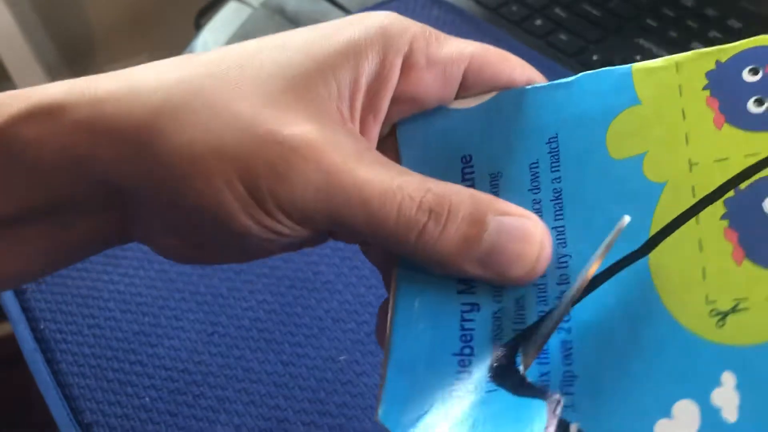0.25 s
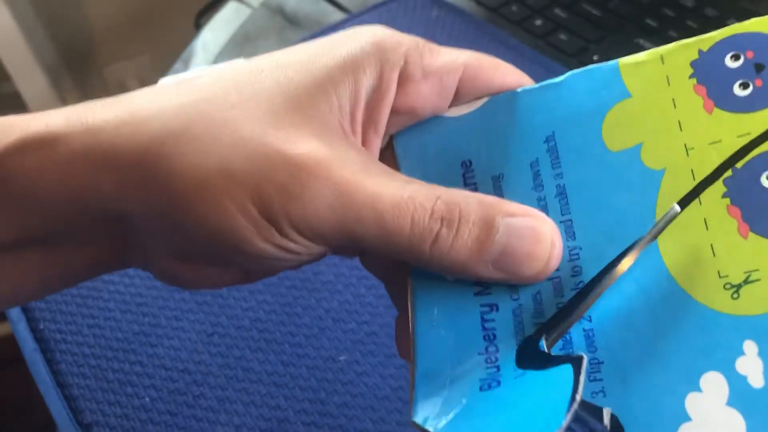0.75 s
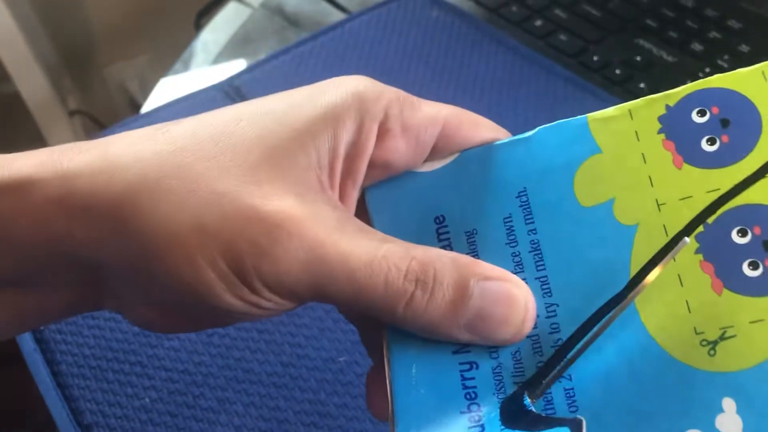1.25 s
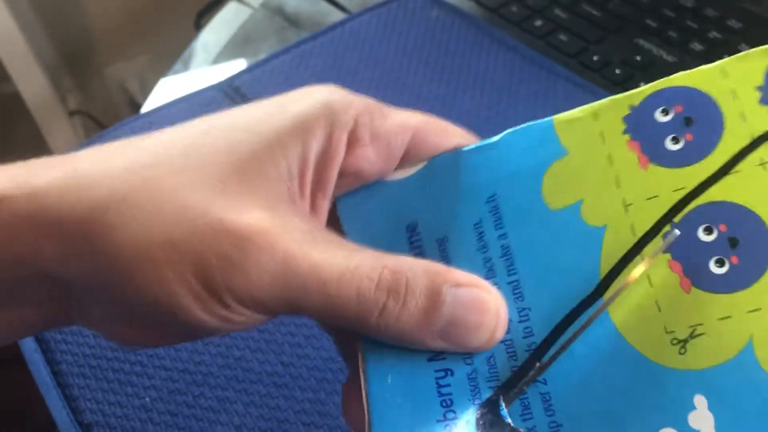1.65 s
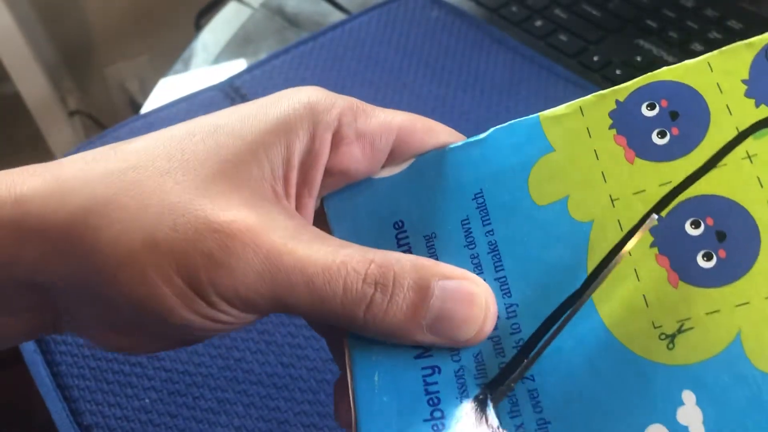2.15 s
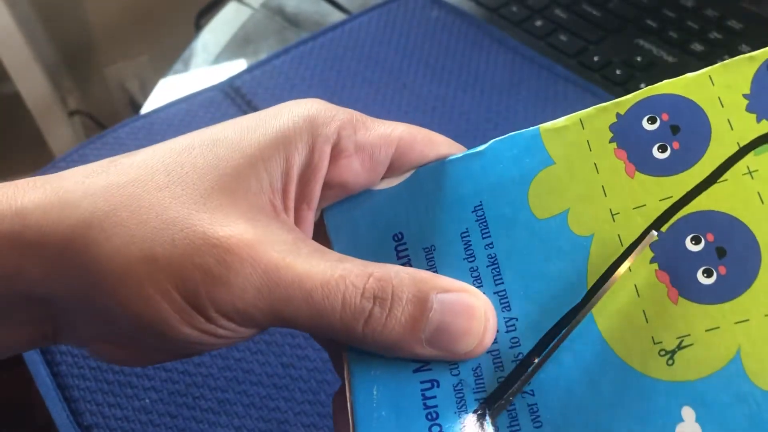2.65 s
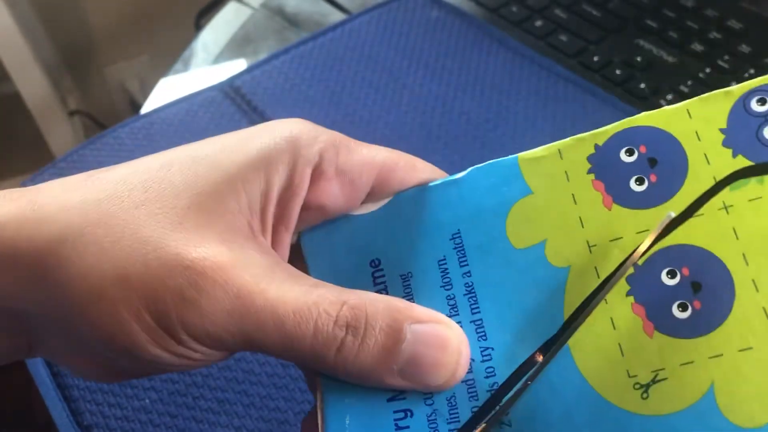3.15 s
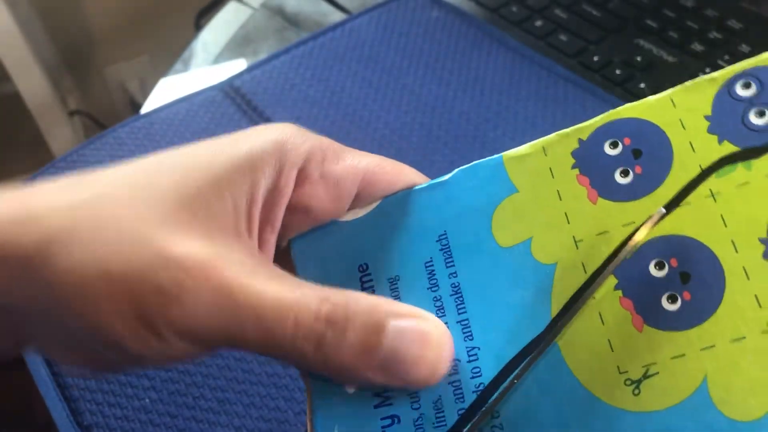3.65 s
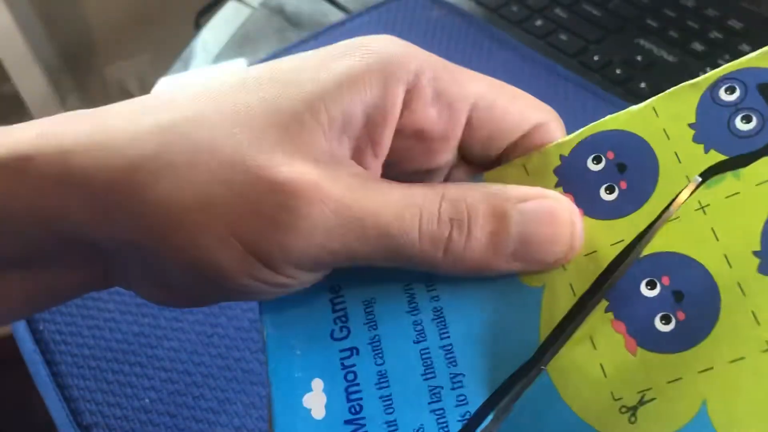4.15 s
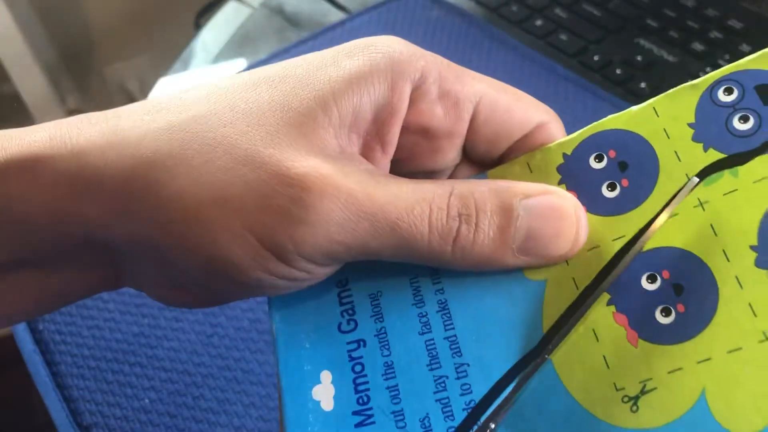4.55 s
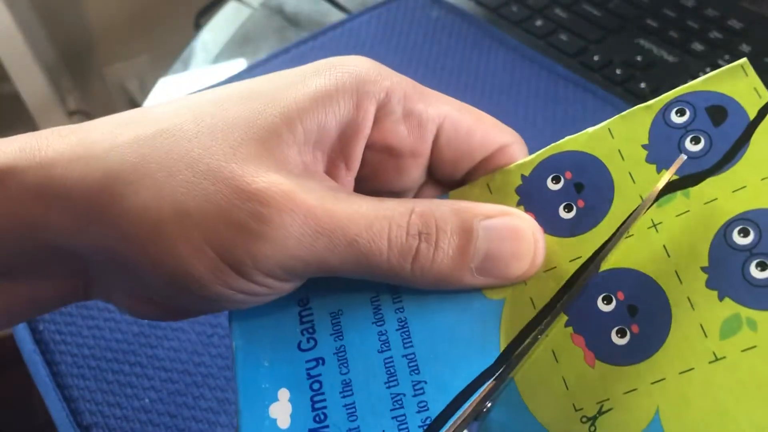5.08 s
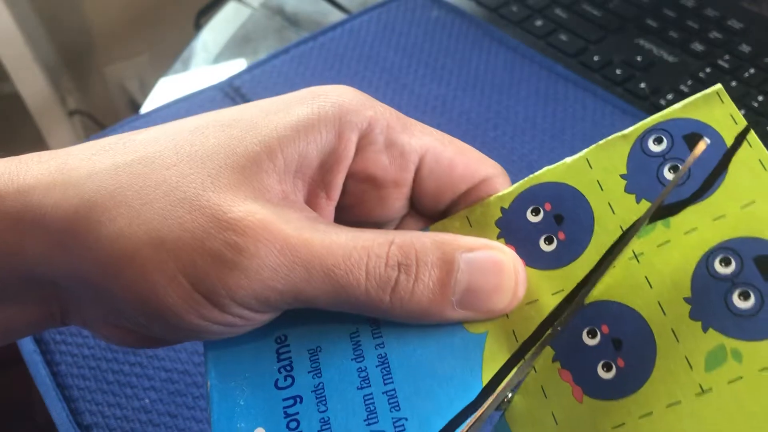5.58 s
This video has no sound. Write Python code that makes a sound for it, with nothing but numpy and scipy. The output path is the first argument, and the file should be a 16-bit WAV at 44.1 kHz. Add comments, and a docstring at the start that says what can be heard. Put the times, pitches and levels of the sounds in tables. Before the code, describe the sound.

Close to the microphone in a quiet room, scissors cut stiff thin card. Soft swishes come first, then a crunch with light steel ticks and snaps. Further short cuts follow irregularly, with blades sliding open between some of them. The hand rubs over the card as it changes hold, then harder, brighter snaps finish the run over a faint low hum.

```python
"""A quiet room with a faint hum: scissors work through a sheet of thin cardboard, close to the microphone.
Each cut is a grainy crunch, most with a run of snaps: fibres give way in tiny bursts and the stiff card carries
them as bending waves, treble first and bass last. The point of contact sets the treble of a whole cut; harder
snaps are quicker. Mostly between the cuts the blades reopen and slide along the slit with a swish; light bright
ticks of steel sound mostly during the cuts. Freed card flaps, the sheet creaks, and once the hand shifts its hold."""
import sys
import numpy as np
from scipy import signal
from scipy.fft import rfft, irfft
from scipy.io import wavfile
from scipy.ndimage import uniform_filter1d

SR = 44100
rng = np.random.default_rng(int(sys.argv[2]) if len(sys.argv) > 2 else 0)


def dump_mix(stems):
    """Bounce the given channels to the path in sys.argv[1] as a 16-bit WAV at rate SR."""
    frames = np.atleast_2d(stems).T  # one column per channel
    limited = np.clip(frames, -1, 1)  # hard clip at full scale
    pcm = np.round(limited * 32767).astype(np.int16)
    wavfile.write(sys.argv[1], SR, pcm)


N = 256662
LEAD_S = 0.012  # a burst has this much room for its warning before the fracture

# Snaps of the card; the less of the sheet is free to swing, the higher it rings:
# (time [s], level [dB], thud [dB], body [dB], pitch of the sheet [Hz])
SNAPS = [(0.7142, -2.5, -3.5, -2.5, 890), (0.8458, 1, 3.5, 6.5, 1060), (1.2839, -13, 4, 5.5, 1090),
         (1.288, -6, 3, 1, 1070), (1.3171, -7, 6.5, 5.5, 930), (1.327, -12.5, 6, 1, 270),
         (1.3694, -8, 14.5, 12, 1010), (1.3965, -10.5, 4.5, -6, 230), (1.586, -16, 9, 0, 397),
         (2.3976, -24, 16.5, 11, 600), (2.5715, -10.5, 7, 2, 260), (2.6188, 0, 9, 0.5, 720),
         (2.6606, -5, 9, 2.5, 215), (2.685, -4.5, 3.5, 0, 215), (2.7673, -1, 11, 4.5, 208),
         (3.267, -4.5, 2, 3, 470), (3.2711, -7, 11.5, 1.5, 447), (3.329, -13.5, 10.5, 5.5, 525),
         (3.3397, -14, -4, -1, 810), (3.3614, -13, -4, 2, 790), (3.393, -2.5, 6.5, -2, 227),
         (3.5738, 0.5, 9.5, 5, 1360), (3.6383, -13.5, -14, -9, 240), (3.687, -4, 2.5, -18, 240),
         (3.722, -18, 9, 4, 473), (3.8708, -12, 0, -2.5, 467), (3.9238, -15, 5, 0, 300),
         (4.3965, -8.5, -5, 3.5, 1580), (4.4045, -10.5, 2, -5, 616), (4.447, -9, 0, 1, 1110),
         (4.48, -1.5, 2, 7.5, 1950), (4.4962, -0.5, -3, 9, 1770), (4.5079, -7, 6.5, 5, 1900),
         (4.518, 4, -9, 5, 1050), (4.5450, 10.5, -4, -0.5, 1100), (4.5856, -1, -1.5, 8.5, 1180),
         (5.0471, -8.5, -1, 1, 412), (5.0494, -.5, 1.5, -1.5, 422), (5.0854, -7.5, 0, -4, 320),
         (5.0914, -15, 12, 7, 415), (5.1116, -4, 5.5, -16, 510), (5.126, -10.5, 2, -.5, 464),
         (5.2514, -17.5, -3, 0, 1570), (5.351, 1.5, 0.5, -3.5, 510), (5.427, -18, -13, -2, 238),
         (5.6442, -0.5, -1, -9, 1820), (5.6467, 1, -7, -3.5, 2030), (5.6814, 14, -9.5, -6, 2080),
         (5.708, 5.5, -11, -1.5, 2090), (5.7304, 5, -17, -3.5, 1920), (5.7399, 3.5, 5, -1, 420)]
# Crunching stretches, most of them closings of the blades; one at 5.34 s lies under a swish.
# The snaps inside one share its burst length, fizz and blade resonance:
# (start [s], end [s], crunch level [dB], place of the firmest pressure [0-1], fibre burst of a 0 dB snap [s],
#  fizz [dB], resonance of the blades [Hz])
CUTS = [(0.472, 0.997, -61.5, 0.65, 0.0022, 2.5, 5850), (1.259, 1.43, -53.5, 0.22, 0.0012, 2.5, 6300),
        (2.10, 2.433, -73, 0.4, 0.0023, -41, 2170), (2.562, 2.912, -54.5, 0.41, .0018, 1.5, 5700),
        (3.193, 3.431, -52, 0.88, 0.0016, -0.5, 3400), (3.555, 3.802, -51.5, 0.8, 0.00093, -5, 3650),
        (4.401, 4.594, -51.5, 0.4, 0.00098, -6.5, 3900), (4.998, 5.296, -50.5, 0.05, 0.0017, -1, 3400),
        (5.336, 5.435, -55, 0.45, 0.0017, -0.5, 4200), (5.647, 5.76, -54, 0.3, 0.0015, -8, 5270)]
# Swishes of the opening blades along the slit:
# (start [s], end [s], level [dB], place of the firmest pressure [0-1], body [dB],
#  resonance of sheet or blade [Hz])
SLIDES = [(0.124, 0.202, -51.5, 0.67, -0.5, 2200), (0.241, 0.356, -42, 0.74, -4.5, 2180),
          (1.003, 1.106, -42.5, 0.45, -3, 6570), (1.587, 1.659, -42, 0.17, -2, 6440),
          (2.952, 3.024, -34.5, 0.47, -2, 667), (3.946, 4.067, -36.5, 0.36, 0.5, 1930),
          (4.727, 4.836, -37, 0.37, -0.5, 1940), (5.333, 5.417, -37, 0.48, -0.5, 513)]
# Colour of steel rubbing the cut edge: (frequency [Hz], level [dB])
RUB_COLOUR = [(60, -7), (160, -2), (400, 0.5), (1000, 3.5), (1800, -1), (3100, 3), (4300, 0), (5300, 2.5),
              (6600, 0.5), (7600, -4.5), (9000, -18), (12000, -21), (15500, -19.5)]


def amp(db):
    """Decibels to gain."""
    return 10 ** (np.asarray(db) / 20)


def evened(x):
    """Scales to an rms of 1."""
    return x / np.sqrt(np.mean(x ** 2) + 1e-20)


def read(points, hz):
    """Reads a table on a log-frequency axis."""
    f, value = np.transpose(points)
    return np.interp(np.log(hz + 1), np.log(f + 1), value)


def add(mix, s, sound):
    """Mixes a sound in at time s."""
    part = mix[max(round(s * SR), 0):][:len(sound)]
    part += sound[:len(part)]


def bump(hz, centre_hz, octaves):
    """A bell of height 1 on the log-frequency axis."""
    return np.exp(-0.5 * (np.log2((hz + 1) / centre_hz) / octaves) ** 2)


def causal(db):
    """The minimum-phase response that has this gain."""
    log_gain = np.log(amp(np.r_[db, db[-2:0:-1]]))
    return np.exp(np.conj(signal.hilbert(log_gain)))[:len(db)]


def drift(n, per_s):
    """Random wandering: straight lines between per_s normal draws a second."""
    place = np.arange(n) * per_s / SR
    count = int(place[-1]) + 2
    return np.interp(place, np.arange(count), rng.standard_normal(count))


def background(air_db=-66.5, hum_rise_s=0.68, waver_turns=0.25):
    """Still air as coloured noise, and the slightly wavering hum of an appliance that swells in."""
    # Colour of the still room, its overall level set by air_db: (frequency [Hz], relative level [dB per Hz])
    air_colour = [(25, -59), (50, -9), (75, -2.5), (130, -3), (200, -3.5), (300, -7.5), (500, -13.5),
                  (1000, -20.5), (2000, -25), (6500, -28.5), (9500, -34), (16000, -36)]
    # Tones of the hum: (frequency [Hz], level [dB])
    hum_tones = [(123.5, -68), (248, -74)]
    noise = rfft(rng.standard_normal(N))
    air = irfft(noise * amp(read(air_colour, np.fft.rfftfreq(N, 1 / SR))), N)
    t = np.arange(N) / SR
    waver = amp(1.5 * drift(N, 6))
    hum = np.zeros(N)
    for hz, db in hum_tones:
        turns = hz * t + waver_turns * drift(N, 3.1)
        hum += amp(db) * np.sqrt(2) * np.sin(2 * np.pi * turns)
    swell = np.minimum(t / hum_rise_s, 1) ** 2
    return amp(air_db) * evened(air) + swell * waver * hum


def reflections(early_db=2.0, early_s=0.032, gap_s=0.0015):
    """Dense echoes, strongest from the near desk, each band dying at its own speed."""
    # Time for the echoes to fall by 60 dB: (frequency [Hz], time [s])
    decay_times = [(100, 0.13), (400, 0.45), (1500, 0.51), (5000, 0.59), (9000, 0.48), (16000, 0.26)]
    # Echo against the direct sound: (frequency [Hz], level [dB])
    echo_colour = [(80, -2), (160, -1.5), (400, -7.5), (1000, -12), (3000, -14.5), (6000, -16), (15000, -5)]
    time = np.arange(SR) / SR
    early = 1 + amp(early_db) * np.exp(-time / early_s)
    taps = rng.standard_normal(SR) * (time > gap_s) * early
    hz, t, z = signal.stft(taps, SR, nperseg=256)
    decay = amp(-60 * t / read(decay_times, hz)[:, None])
    tail = signal.istft(z * decay, SR, nperseg=256)[1]
    colour = irfft(causal(read(echo_colour, np.fft.rfftfreq(2048, 1 / SR))))
    return signal.fftconvolve(tail / np.linalg.norm(tail), colour)


def room(x, sway_per_s=1.3):
    """The hands move, so the sound sways between two echo patterns."""
    turn = 2 * np.pi * sway_per_s * np.arange(N) / SR
    return sum(signal.fftconvolve(x * share, reflections())[:N] for share in (np.cos(turn), np.sin(turn)))


def rustle(per_s=16, db=-83.5, decay_s=0.0012):
    """Faint creaks of the sheet in the gripping hand, a few larger than the rest."""
    size = amp(4 * np.minimum(rng.exponential(1, N), 2))
    grains = rng.choice([-1, 1], N) * size * (rng.random(N) < per_s / SR)
    t = np.arange(SR // 100) / SR
    creak = rng.standard_normal(len(t)) * np.exp(-t / decay_s)
    creaks = signal.fftconvolve(grains, creak)[:N]
    coloured = irfft(rfft(creaks) * amp(read(RUB_COLOUR, np.fft.rfftfreq(N, 1 / SR))), N)
    return amp(db) * evened(coloured)


def friction(pressure_db, body_db, ring_hz, grain_db, judder_db, ring_db, judder_per_s=810.0,
             width_hz=46.0, loss=0.022, ripple_db=2.67, size=2048):
    """Fibre contacts under changing pressure ring the sheet or a blade, whose modes shift with every grip."""
    n, hz = len(pressure_db), np.fft.rfftfreq(size, 1 / SR)
    roughness_db = grain_db * rng.standard_normal(n) + judder_db * drift(n, judder_per_s)
    contacts = rng.standard_normal(n) * amp(roughness_db)
    rub = evened(contacts) * amp(pressure_db) * signal.windows.tukey(n, 0.1)
    modes_db = ripple_db * evened(uniform_filter1d(rng.standard_normal(len(hz)), size=14))
    # one mode stands out; higher modes are wider
    modes_db += ring_db / (1 + ((hz - ring_hz) / (width_hz + loss * ring_hz)) ** 2)
    body = [(180, 0), (550, body_db), (1400, body_db), (2800, 0.0053)]
    colour_db = read(RUB_COLOUR, hz) + read(body, hz) + modes_db
    return signal.fftconvolve(rub, irfft(causal(colour_db)))


def stroke(start, end, db, firmest, ease_db):
    """Pressure in dB: a parabola about the firmest place, ease_db down one stroke length away."""
    place = np.linspace(0, 1, max(round((end - start) * SR), 256))
    return db - ease_db * (place - firmest) ** 2


def regrip():
    """Skin rubs over the card as the hand slips to a new hold."""
    # Pressure of the slipping hand: (time [s], level [dB])
    hand_pressure = [(3.6, -58), (3.668, -46.5), (3.69, -33), (3.71, -48), (3.806, -49.5), (3.84, -59),
                     (3.874, -48.5), (3.884, -51), (3.928, -48), (3.945, -66)]
    out, (s, db) = np.zeros(N), np.transpose(hand_pressure)
    pressure_db = np.interp(np.arange(s[0], s[-1], 1 / SR), s, db)
    add(out, s[0], friction(pressure_db, body_db=-6, ring_hz=3500, grain_db=8.0, judder_db=4.5,
                            ring_db=0.5, judder_per_s=290.0))
    return out


def flaps(centre_hz=110.8, delay_s=0.00824, flap_db=-58.5, follows=0.22, release_db=-21.5,
          decay_s=0.019, rise_s=0.0025, detune=0.259, scatter=0.166):
    """The freed strip swings in three low modes after each snap and as each swish lets it go."""
    out, t = np.zeros(N), np.arange(SR // 4) / SR
    swing = (1 - np.exp(-t / rise_s)) * np.exp(-t / decay_s)
    # a flap follows a share of its snap's level and thud; a release is set against its swish
    jolts = [(s + delay_s, flap_db + follows * (db + thud_db)) for s, db, thud_db, *_ in SNAPS]
    releases = [(end, db + release_db) for _, end, db, *_ in SLIDES]
    for s, db in jolts + releases:
        hz = centre_hz * np.exp(scatter * rng.standard_normal())
        modes = sum(np.sin(2 * np.pi * (hz * (1 + k * detune) * t + rng.random())) for k in (-1, 0, 1))
        add(out, s, amp(db) * swing * modes)
    return out


def burst(length, spread_db=5.5, crush_db=-7.0, crush_s=0.0025, rattle_db=-2.0, rattle_s=0.0026,
          tough_s=0.0025, size=4096):
    """Spectrum of a cluster of tiny fractures, LEAD_S into the frame; level 1 over any broad band."""
    t = np.arange(size) / SR - LEAD_S
    u = np.maximum(t, 0) / max(length, 1 / SR)
    tough = min(length / tough_s, 1)  # slow breaks give warning, quick ones come out of nothing
    crush = tough ** 2 * amp(crush_db) * np.exp(-abs(t) / crush_s) * (t < 0)  # the edge presses in ever harder
    fracture = 3.4 * u * np.exp(-1.25 * u)  # peaks near 1
    rattle = amp(rattle_db) * np.exp(-abs(t) / rattle_s) * (t >= 0)  # waves return from the sheet's edges
    cracks = rng.standard_normal(size) * amp(spread_db * np.clip(rng.standard_normal(size), -2, 2))
    z = rfft(cracks * (crush + fracture + rattle))
    power = uniform_filter1d(uniform_filter1d(abs(z) ** 2, size=40), size=40)
    return z * causal(-10 * np.log10(power + 1e-12))


def ticks(length=0.0011, size=4096):
    """Short bright contacts of steel on steel, each a coloured burst."""
    # Light ticks where the two edges catch: (time [s], level [dB])
    catches = [(0.489, -32), (0.541, -26), (0.571, -24), (0.599, -30), (0.637, -23.5), (0.681, -26),
               (0.7027, -20), (2.48, -37), (2.866, -31), (3.1636, -26.5), (5.0015, -27.5)]
    # Colour of a tick: (frequency [Hz], level [dB])
    tick_colour = [(200, 0), (1500, -12), (3000, -8), (6000, 1.5), (9000, -9), (13000, -19.5), (16000, -1)]
    out, hz = np.zeros(N), np.fft.rfftfreq(size, 1 / SR)
    for s, db in catches:
        add(out, s - LEAD_S, irfft(burst(length) * causal(db + read(tick_colour, hz))))
    return out


def swishes():
    """The opening blades slide along the slit with a fine, even grain."""
    out = np.zeros(N)
    for start, end, db, firmest, body_db, ring_hz in SLIDES:
        pressure_db = stroke(start, end, db, firmest, ease_db=44)
        add(out, start, friction(pressure_db, body_db, ring_hz, grain_db=3.5, judder_db=2.5,
                                 ring_db=6.5, judder_per_s=299.4))
    return out


def crunches():
    """The blades, mostly closing, shear fibres with a coarse, juddering grain."""
    out = np.zeros(N)
    for start, end, db, firmest, *_, blade_hz in CUTS:
        pressure_db = stroke(start, end, db, firmest, ease_db=19)
        add(out, start, friction(pressure_db, body_db=-4, ring_hz=blade_hz, grain_db=8.5, judder_db=5.5,
                                 ring_db=3.0))
    return out


def snaps(lag_s=0.002556, ring_db=9.5, blade_db=7.5, quicken_db=24, size=4096):
    """Each burst of breaking fibres is coloured by sheet and blades and spread into a falling chirp."""
    # Colour of a plain snap: (frequency [Hz], level [dB])
    snap_colour = [(60, -24.5), (150, -9), (260, -4), (600, -2), (1300, -1.5), (2600, -2.5), (4000, -0.5),
                   (5400, -2.5), (6600, -2.5), (8200, -13), (10000, -21), (13000, -22.5), (16000, -21)]
    out, hz = np.zeros(N), np.fft.rfftfreq(size, 1 / SR)
    # bending waves travel as the root of frequency up to a top speed, whose travel time is taken off;
    # lag_s is about the whole travel time at 1 kHz
    travel = lag_s * np.maximum(np.sqrt(1000 / (hz + 40)) - 0.5, 0)
    chirp = np.exp(-2j * np.pi * np.cumsum(travel) * SR / size)
    for s, db, thud_db, body_db, sheet_hz in SNAPS:
        # the crunching stretch that holds this snap, or the nearest one
        *_, length, fizz_db, blade_hz = min(CUTS, key=lambda cut: max(cut[0] - s, s - cut[1]))
        bands = [(450, thud_db), (1150, body_db), (1950, body_db), (2600, 0), (6000, 0), (10000, fizz_db)]
        # the sheet's mode is broad; the blades' is narrower and moves with the point of contact
        sheet = ring_db * (bump(hz, sheet_hz, 0.35) - 0.6 * bump(hz, sheet_hz, 0.8))
        blade = blade_db * (bump(hz, blade_hz, 0.1) - 0.4 * bump(hz, blade_hz, 0.35))
        colour = causal(db + read(snap_colour, hz) + read(bands, hz) + sheet + blade)
        # a snap quicken_db harder is over in half the time
        fibres = burst(length * 2 ** (-db / quicken_db))
        add(out, s - LEAD_S, irfft(fibres * colour * chirp))
    return out


def scene():
    """Scissors and card close by, the room behind them."""
    cutting = snaps() + swishes() + crunches() + regrip() + ticks() + flaps() + rustle()
    return (cutting + room(cutting) + background())[None]


def record(dry, low_hz=47.0, edge_hz=16100):
    """The microphone's bass roll-off, then the band limit."""
    thin = signal.sosfilt(signal.butter(3, low_hz, "highpass", fs=SR, output="sos"), dry)
    band_limit = signal.firwin(511, edge_hz, window=("kaiser", 9), fs=SR)
    return signal.oaconvolve(thin, band_limit[None], "same")


dry = scene()
out = record(dry)
dump_mix(out)
```